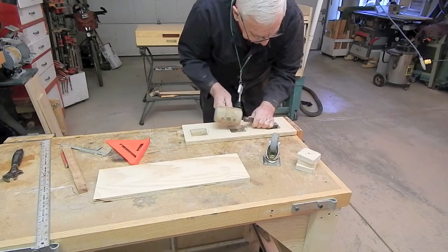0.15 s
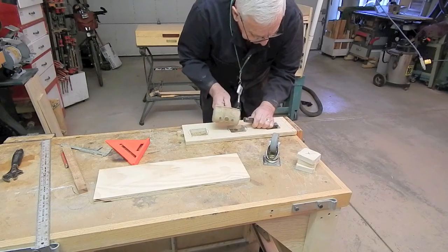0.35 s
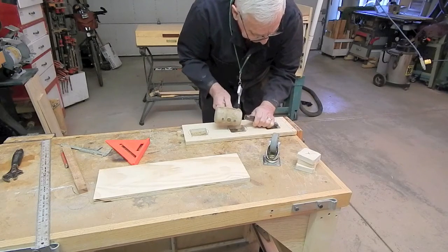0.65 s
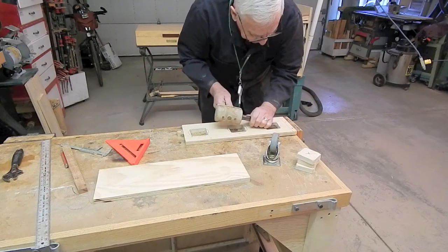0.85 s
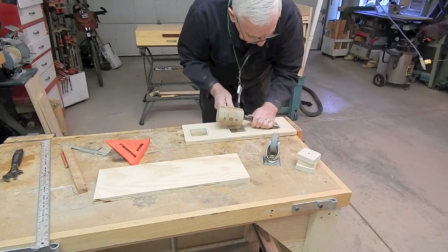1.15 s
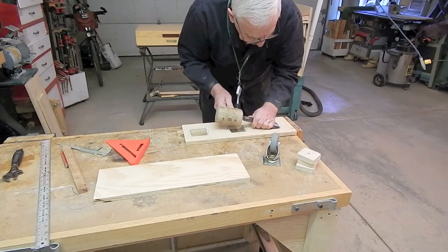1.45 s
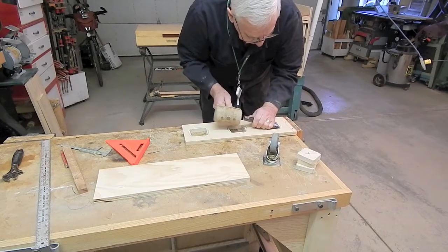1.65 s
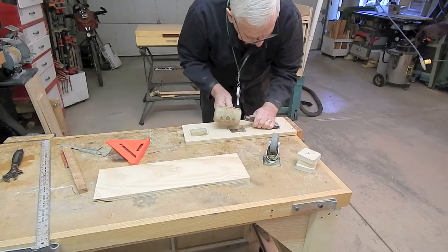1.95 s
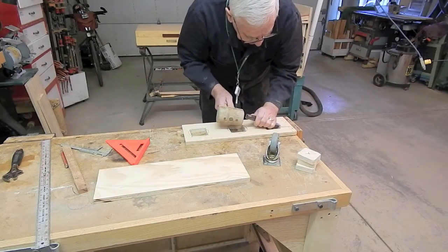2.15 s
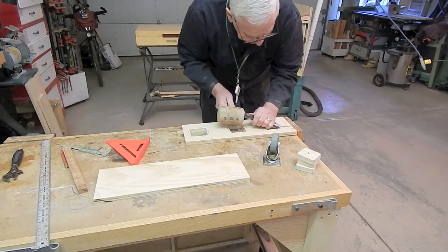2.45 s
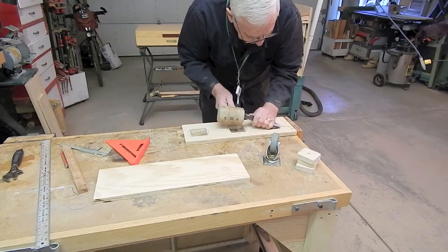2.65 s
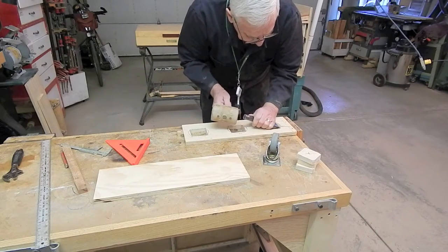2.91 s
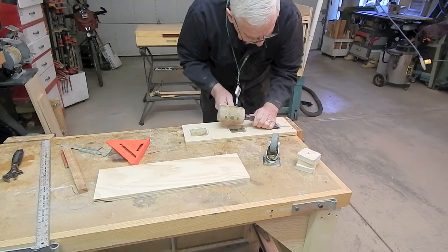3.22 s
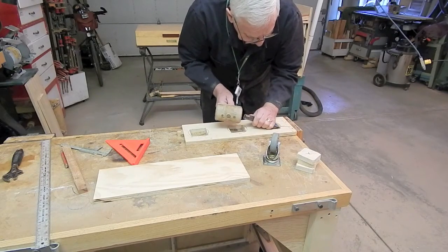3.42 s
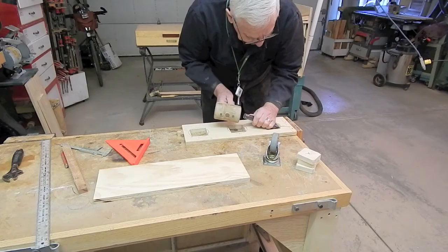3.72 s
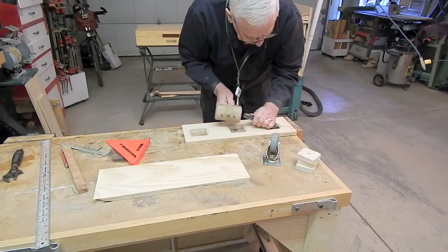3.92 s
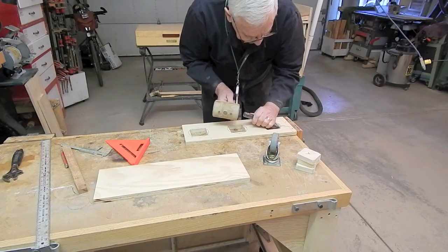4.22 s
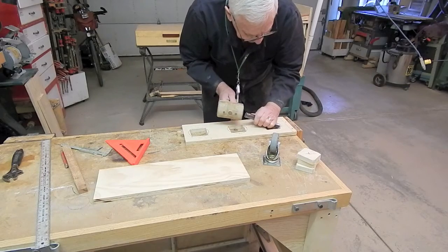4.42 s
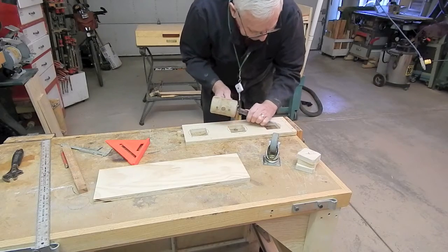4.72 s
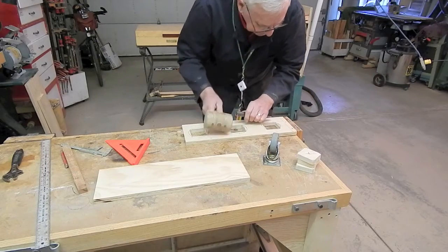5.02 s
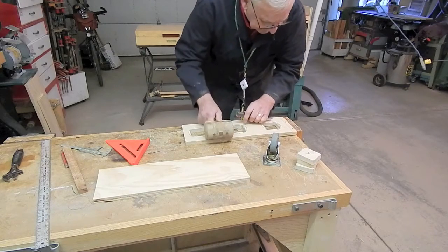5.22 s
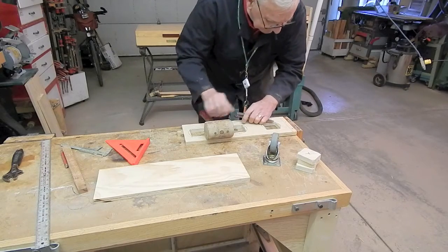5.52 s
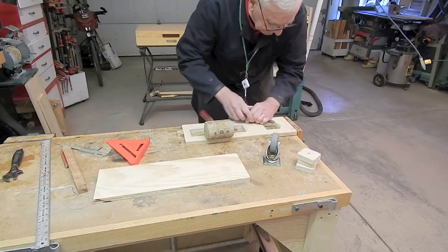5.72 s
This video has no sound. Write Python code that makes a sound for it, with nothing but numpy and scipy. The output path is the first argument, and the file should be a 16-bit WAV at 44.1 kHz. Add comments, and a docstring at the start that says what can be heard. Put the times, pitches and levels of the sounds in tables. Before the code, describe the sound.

In a garage workshop, a wooden mallet strikes a chisel into a board on a heavy bench. Sharp clacks with a slight steel ting and low bench boom come in groups of three or so, about four a second, separated by short pauses with faint chisel repositioning. Wood chips snap. The mallet is put down with a double clunk and a hand brushes the board. The stereo microphone hears clear room reflections over a quiet hum.

```python
"""Garage workshop: a wooden mallet drives a chisel into a board on a workbench, mostly in groups of three.
Each blow sums decaying sines for mallet and handle, blade, board note and bench, plus noise for
contact, fibres and dense bench modes; bench boom weakens through most groups as the chisel bites deeper.
Chips snap as click, crackle and ting; the mallet is put down and rocks to rest. Noise tails form the room.
A hand brushes the board (shaped noise); faint air noise and a hum of steady sines run throughout."""
import sys
import numpy as np
from scipy import signal
from scipy.io import wavfile

SR = 44100
rng = np.random.default_rng(int(sys.argv[2]) if len(sys.argv) > 2 else 0)


def waveform_to_disk(signal):
    """Save audio, clipped to [-1, 1], as 16-bit WAV at the path in sys.argv[1]."""
    frames = np.transpose(np.atleast_2d(signal))
    scaled = np.clip(frames, -1, 1) * 32767
    samples = np.round(scaled).astype(np.int16)
    wavfile.write(sys.argv[1], SR, samples)


N = 258426
AGE_S = np.arange(SR) / SR   # time since an event
EDGES_HZ = 25 * 2 ** np.arange(0, 9.6, .5)
CENTRES_HZ = np.sqrt(EDGES_HZ[1:] * EDGES_HZ[:-1])
BANK = [signal.butter(2, pair, "band", fs=SR, output="sos") for pair in zip(EDGES_HZ, EDGES_HZ[1:])]


def from_db(db):
    """Decibels to gain."""
    return 10 ** (np.asarray(db) / 20)


def at_hz(rows, hz):
    """Columns of a table, interpolated on a log-frequency axis."""
    freqs_hz, *columns = np.transpose(rows)
    return [np.interp(np.log(hz), np.log(freqs_hz), column) for column in columns]


def fade(t60_s):
    """Free exponential decay, 60 dB in t60_s."""
    return np.exp(-np.log(1000) * AGE_S / max(t60_s, 1e-4))


def ring(hz, t60_s):
    """A struck mode: a decaying sine."""
    return np.sin(2 * np.pi * hz * AGE_S) * fade(t60_s)


def unit_energy(x):
    """Scale to a sum of squares of one."""
    return x / np.sqrt(np.sum(x ** 2) + 1e-20)


def later(x, delay_s):
    """The same sound, delayed."""
    return np.interp(AGE_S - delay_s, AGE_S, x, left=0)


def add(out, start_s, sound):
    """Mix a sound in from start_s; it may have begun before time zero."""
    start = round(start_s * SR)
    part = sound[:, max(-start, 0):N - start]
    begin = max(start, 0)
    out[:, begin:begin + part.shape[-1]] += part


def coloured(bands, spectrum):
    """Noise bands weighted by a spectrum; rms 1."""
    noise = np.tensordot(from_db(at_hz(spectrum, CENTRES_HZ)[0]), bands, 1)
    return noise / noise.std()


def burst(noise, t60_s):
    """A decaying crackle cut at random from a noise, starting near rms 1."""
    start = rng.integers(N - SR)
    envelope = fade(t60_s)
    return unit_energy(noise[:, start:start + SR] * envelope) * np.sqrt(2 * np.sum(envelope ** 2))


# Room air spectrum. Each row: frequency in Hz, relative level in dB.
AIR = [(15, -31), (25, 5.5), (114, 6.5), (373, -2), (476, -2), (516, -19), (641, -59), (840, -20),
       (936, -4), (1020, -14), (1400, -9), (2050, -15.5), (3620, -18), (16000, -28)]
AIR_RMS_DB = -52.5
# Machine hum partials. Each row: frequency in Hz, level in dB rms.
HUM = [(107.7, -61.5), (479.1, -63.5), (958.2, -65), (1200, -72), (1437, -70.5)]
# Hand on the board. Each row: time in s, level in dB before the brush gain.
BRUSH = [(5.63, -91), (5.696, -64), (5.785, -64), (5.834, -55), (5.86, -69)]
# Spectrum of the brushing. Each row: frequency in Hz, relative level in dB per Hz.
BRUSH_COLOUR = [(1500, 9), (4000, 9), (7000, -0.5), (12000, 21), (16000, 4)]


def background(bands, brush_gain_db=1):
    """Air as coloured noise, machine hum as steady sines, the sliding hand as noise swelling and fading."""
    t_s = np.arange(N) / SR
    hum = sum(np.sqrt(2) * from_db(db) * np.sin(2 * np.pi * (hz * t_s + rng.random())) for hz, db in HUM)
    times_s, brush_db = np.transpose(BRUSH)
    brush_gain = np.interp(t_s, times_s, from_db(brush_db + brush_gain_db), left=0)
    brush = brush_gain * coloured(bands, BRUSH_COLOUR)
    return from_db(AIR_RMS_DB) * coloured(bands, AIR) + hum + brush


# Workshop acoustics. Each row: frequency in Hz, early reflections in dB, reverberation in dB,
# reverberation t60 in s, left-right likeness (1 = identical sides).
ROOM = [(67, -32, 4, 1.35, 1), (129, -21, -12.5, 0.6, 0.67), (227, -2, -4, 0.64, 0.95),
        (505, -13, -7, 0.75, 0.83), (788, 6, 3.5, 0.63, 0.97), (1404, 0, -14, 0.96, 0.73),
        (2484, 7, 8.5, 0.65, 0), (3516, 33, -2.5, 0.73, 0.74), (4170, -42, -7.5, 0.85, 0),
        (6500, 2.5, -2, 0.53, 0), (14000, 5, -2, 0.7, 0.29)]


def diffuse_bands():
    """Half-octave bands of stereo noise; left-right likeness varies with frequency."""
    white, bands = rng.standard_normal((2, 2, N)), []
    for k, hz in enumerate(CENTRES_HZ):
        mid, side = signal.sosfilt(BANK[k], white[k % 2])
        alike = np.clip(at_hz(ROOM, hz)[-1], -1, 1)
        bands.append(np.sqrt((1 + alike) / 2) * mid + np.sqrt((1 - alike) / 2) * side * [[1], [-1]])
    return np.array(bands)


def echo_envelopes(early_t60_s, early_rise_s, late_rise_s):
    """Per band: quick reflections off bench and floor, then the slow tail of the room."""
    early_shape = unit_energy(fade(early_t60_s) * (1 - np.exp(-(AGE_S / early_rise_s) ** 2)))
    late_rise = 1 - np.exp(-AGE_S / late_rise_s)
    envelopes = []
    for hz in CENTRES_HZ:
        early_db, late_db, t60_s, _ = at_hz(ROOM, hz)
        early = from_db(early_db) * early_shape
        late = from_db(late_db) * unit_energy(fade(t60_s) * late_rise)
        envelopes.append(np.hypot(early, late))
    return np.array(envelopes)


def workshop(parts, bands, envelopes, send_db):
    """Direct sound plus convolution with a noise tail, drawn afresh for each event."""
    start = rng.integers(N - SR)
    echoes = np.einsum("bct,bt->ct", bands[:, :, start:start + SR], envelopes)
    # each part throws its own share into the room
    sent = sum(from_db(db) * part for db, part in zip(send_db, parts))
    return sum(parts) + signal.fftconvolve(sent, echoes, axes=1)[:, :SR]


# Wood fibres giving way at the blade. Each row: start in s, level in dB before part gains, t60 in s.
SNAPS = [(0.906, -46.5, 0.12), (1.2198, -45.5, .04), (2.176, -40.5, 0.0065), (3.934, -19.5, 0.011),
         (4.571, -30.5, 0.052), (4.8214, -28.5, 0.005), (5.089, -42, 0.0042)]
# Spectrum of a snapping fibre. Each row: frequency in Hz, relative level in dB per Hz.
SNAP_COLOUR = [(1500, 4.5), (4000, 5.5), (7000, -3), (10000, 0.5), (13000, -6), (16000, -101)]
SNAP_T60_S, SNAP_RISE_SHARE = 0.012, 0.035   # reference length; rise time constant as a share of t60
CLICK_DB_PER_HALVING = 14   # a shorter snap is more of a click


def chips(bands, envelopes, crackle_db=-6, click_db=0, click_low_hz=6200, click_high_hz=12500,
          blade_hz=4400, blade_db=-9, blade_t60_s=0.0038):
    """Fibres give way with one sharp click and a bright crackle that tings the blade."""
    out, crackle = np.zeros((2, N)), coloured(bands, SNAP_COLOUR)
    click_band_hz = np.clip([click_low_hz, click_high_hz], 10, .45 * SR)
    treble = signal.butter(2, click_band_hz, "band", fs=SR, output="sos")
    pulse = signal.sosfilt(treble, (AGE_S == 0) + 1e-18)
    for start_s, snap_db, t60_s in SNAPS:
        pulse_db = snap_db + CLICK_DB_PER_HALVING * np.log2(SNAP_T60_S / t60_s)
        build_up = 1 - np.exp(-AGE_S / (SNAP_RISE_SHARE * t60_s))
        click = from_db(pulse_db + click_db) * pulse
        snap = click + from_db(snap_db + crackle_db) * burst(crackle, t60_s) * build_up
        ting = from_db(snap_db + blade_db) * ring(blade_hz, blade_t60_s + t60_s) * build_up
        add(out, start_s, workshop([snap, ting], bands, envelopes, send_db=[-1.5, -5]))
    return out


# Places worked on the board. Each row: from time in s, board note in Hz, bench thud in dB, fibre crack in dB.
PLACES = [(-1, 760, 0, 3), (0.5, 743, -0.5, 1.5), (2.5, 743, 2, -3.5), (4, 930, 1.5, -0.5),
          (5, 925, -3.5, -12)]


def place_at(time_s):
    """Note, thud and crack of the place being worked."""
    return [row[1:] for row in PLACES if row[0] <= time_s][-1]


# Centres in Hz of the ranges a blow excites, in order: boom, thud, hollow, note, clack, high clack,
# bite, ting, crack.
RANGES_HZ = [115, 220, 450, 780, 1200, 1700, 3100, 4200, 7000]
# Typical blow: drive in dB of each range, same order.
FORCE_DB = [-8, -10, 2.5, -2.5, -0.25, -4, -15.5, -18.5, -19.5]
GIVE_BELOW_HZ, HARD_ABOVE_HZ = 292, 1310   # give feeds the bass, hard contact the treble


def force(strength_db, give_db, hardness_db, thud_db, crack_db):
    """Drive of each range in dB: a typical blow shaped by stroke, board give, contact hardness and place."""
    hz = np.array(RANGES_HZ)
    bass = 1 / (1 + (hz / GIVE_BELOW_HZ) ** 4)
    treble = 1 / (1 + (HARD_ABOVE_HZ / hz) ** 8)
    place_db = np.array([0, thud_db, 0, 0, 0, 0, 0, 0, crack_db])
    return strength_db + np.array(FORCE_DB) + give_db * bass + hardness_db * treble + place_db


def mode_shapes(modes, rise_s):
    """Ringing of each mode, building up over rise_s; neighbours swing in opposite senses."""
    rings = [(-1) ** k * ring(hz, t60_s) for k, (hz, _, t60_s) in enumerate(modes)]
    return np.array(rings) * (1 - np.exp(-AGE_S / rise_s))


def struck(modes, shapes, drive_db, scatter_db):
    """Sum of modes, each driven by its range with random scatter per blow."""
    hz, level_db, _ = np.transpose(modes)
    mode_drive_db = np.interp(np.log(hz), np.log(RANGES_HZ), drive_db)
    return from_db(level_db + mode_drive_db + scatter_db * rng.standard_normal(len(hz))) @ shapes


# Dense modes of the bench and what lies on it. Each row: frequency in Hz, relative level in dB per Hz.
SHUDDER = [(35, 1), (70, -26), (150, 14.5), (300, 11.5), (500, -11), (900, 4), (1300, 4), (1800, -1),
           (2500, -12), (4000, -4.5), (8000, -37)]


def shudder(bands, drive_db):
    """Modes too close to tell apart sound as a noise, coloured by the blow."""
    band_drive_db = np.interp(np.log(CENTRES_HZ), np.log(RANGES_HZ), drive_db)
    start = rng.integers(N - SR)
    gains = from_db(at_hz(SHUDDER, CENTRES_HZ)[0] + band_drive_db)
    return np.tensordot(gains, bands[:, :, start:start + SR], 1)


NOTE_T60_S, NOTE_T60_S_PER_DB = 0.16, -0.0138   # a louder note dies sooner
TWIN_RATIO, TWIN_DB = .922, -3   # second mode just below, beating with the first


def board_note(hz, sing_db):
    """Two close modes of the board beat; the louder they ring, the sooner they fade."""
    t60_s = NOTE_T60_S + NOTE_T60_S_PER_DB * sing_db
    return from_db(sing_db) * (ring(hz, t60_s) - from_db(TWIN_DB) * ring(TWIN_RATIO * hz, t60_s))


CLICK_T60_S = .005
SLIP_DB, SLIP_WITHIN_S = 2, .03


def slips(crackle, count=3):
    """The blade slips on through the fibres: a few tiny cracks at random moments just after a blow."""
    out = np.zeros((2, N))
    for start_s in SLIP_WITHIN_S * rng.random(count):
        add(out, start_s, burst(crackle, CLICK_T60_S))
    return out[:, :SR]


# Knocks; the chisel is moved and set near 0.9-1.3 and 2.5-2.6 s, the mallet put down from 5.1 s, then rocks
# to rest. Each row: start in s, strength in dB, board give in dB, contact hardness in dB, board note in dB.
BLOWS = [(-0.01, -10, 5, -5, -0.5), (0.1947, -11, 1.5, -0.5, 5.5), (0.4212, -10, -8, 0, -1),
         (0.906, -62.5, 22.5, 6, -4), (1.3011, -39, 16.5, -6.5, 9.5), (1.5674, -18, 5, -2, 12.5),
         (1.7933, -13.5, -2.5, 1, 7.5), (2.0166, -12, -12, 0, -8), (2.472, -60.5, 26, 4, -1),
         (2.647, -40.5, 8, -8, -1), (3.0032, -13.5, 5.5, 3.5, 4), (3.238, -10.5, 4, 0.5, -8),
         (3.4707, -11.5, 3, 0, -13), (3.8251, -11, 3.5, 0.5, -7), (4.07, -11, 0.5, -1.5, -2.5),
         (4.324, -12.5, -5, 0, -7), (5.118, -12, -1.5, -5, 3.5), (5.1702, -10.5, -8.5, 0.5, -13),
         (5.383, -22, 10, -6, -1), (5.403, -17.5, 1.5, -14, -3), (5.688, -49, 12, -16, 9)]
# Bench frame and top. Each row: frequency in Hz, relative level in dB, t60 in s.
BENCH = [(45, -47, 0.15), (68, -7.5, 0.27), (86.14, -4.5, 0.58), (104.7, 9, 0.26), (113.3, 2, 0.2),
         (128.3, 5.5, 0.2), (153.9, -1.5, 0.21), (190.5, -5.5, 0.35), (220.4, 4, 0.28), (238.7, 2, 0.39),
         (258, -7.5, 0.28), (351.5, -7.5, 0.45), (369.6, -12, 0.31), (404.3, -16, 0.5), (490.6, -19, 0.23),
         (591, -16, 0.33), (678, -14, 0.31), (730, -16.5, 0.23), (912, -13.5, 0.21), (1097, -20, 0.29),
         (1160, -22, 0.2), (1240, -8.5, 0.23), (1303, -10.5, 0.29), (1460, -28.5, 0.2), (1670, -13, 0.07),
         (1675, -23, 0.17), (1714, -13, 0.087), (2026, -2.5, 0.086), (2174, -18, 0.34)]
# Mallet, chisel handle and board. Each row: frequency in Hz, relative level in dB, t60 in s.
WOOD = [(423, 3.5, 0.017), (465.2, 1, 0.06), (509.5, -0.5, 0.048), (737, 8, 0.012), (786, 6.5, 0.032),
        (1058, -9.5, 0.052), (1151.6, -5, 0.058), (1221, -6, 0.052), (1323, -8, 0.086), (1587, 4.5, 0.016),
        (1705, -2, 0.044), (1782, -6.5, 0.049), (1875, -4.5, 0.024), (2250, 0, 0.0098), (2860, 0, 0.0068),
        (3410, 5.5, 0.0087), (3753, -1.5, 0.026)]
# Steel blade, damped by the hand. Each row: frequency in Hz, relative level in dB, t60 in s.
BLADE = [(4026, 6.5, 0.018), (4420, 13, 0.013)]
# Spectrum of the crack of contact. Each row: frequency in Hz, relative level in dB per Hz.
CRACK = [(300, -73), (1200, -59), (2500, 7.5), (4300, 19), (5300, 11.5), (7000, 15), (8000, 3), (11500, 4),
         (13500, -14), (16000, -19)]
BALANCE_DB = -2.5   # left over right


def knocks(bands, envelopes, shudder_envelope, note_db=-5, crackle_db=-7, crackle_t60_s=0.051, click_db=11,
           radiate_hz=260, smack_db=6, smack_hz=1300, smack_t60_s=0.0055,
           rebound_db=-7, rebound_s=.037, rebound_spread_s=0.004087):
    """Mallet on chisel: click and ting, clack of the wood, board note, then the slower boom of the bench."""
    out, crackle = np.zeros((2, N)), coloured(bands, CRACK)
    pan = from_db([[BALANCE_DB / 2], [-BALANCE_DB / 2]])
    # small pieces of wood radiate little bass; the heavy bench gets moving slowly
    small = signal.butter(2, radiate_hz, "high", fs=SR, output="sos")
    wood_shapes = mode_shapes(WOOD, rise_s=0.00051)
    blade_shapes = mode_shapes(BLADE, rise_s=0.00096)
    bench_shapes = mode_shapes(BENCH, rise_s=0.036)
    for start_s, strength_db, give_db, hardness_db, sing_db in BLOWS:
        note_hz, *place_db = place_at(start_s)
        drive_db = force(strength_db, give_db, hardness_db, *place_db)
        high_clack_db, crack_db = drive_db[5], drive_db[8]
        board = pan * from_db(strength_db + note_db) * board_note(note_hz, sing_db)
        wood = pan * signal.sosfilt(small, struck(WOOD, wood_shapes, drive_db, scatter_db=3.0))
        # the board hops and lands again, shaking the bench a second time
        boom = struck(BENCH, bench_shapes, drive_db, scatter_db=2.0)
        hop_s = rebound_s + rebound_spread_s * rng.standard_normal()
        bench = pan * (boom + from_db(rebound_db) * later(boom, hop_s))
        # the mallet head stops dead: a brief pressure pulse, with click and ting of the chisel
        smack = from_db(high_clack_db + smack_db) * ring(smack_hz, smack_t60_s)
        click = from_db(crack_db + click_db) * burst(crackle, CLICK_T60_S)
        click = click + from_db(crack_db + SLIP_DB) * slips(crackle)
        ting = struck(BLADE, blade_shapes, drive_db, scatter_db=3.0)
        contact = pan * (smack + ting) + click
        fibres = from_db(crack_db + crackle_db) * burst(crackle, crackle_t60_s)
        parts = [wood, board, bench, contact, fibres]
        add(out, start_s, workshop(parts, bands, envelopes, send_db=[-2.0, -5, -6.5, -8.5, 5.0]))
        add(out, start_s, pan * shudder(bands, drive_db) * shudder_envelope)
    return out


def scene(shudder_rise_s=0.0027, shudder_t60_s=0.55):
    """Knocks and chips in the workshop, over its quiet background."""
    bands = diffuse_bands()
    envelopes = echo_envelopes(early_t60_s=0.15, early_rise_s=0.001, late_rise_s=0.03)
    shudder_envelope = fade(shudder_t60_s) * (1 - np.exp(-AGE_S / shudder_rise_s))
    blows = knocks(bands, envelopes, shudder_envelope)
    return blows + chips(bands, envelopes) + background(diffuse_bands())


CUTOFF_HZ = 16200


def record(dry, top=1.24):
    """Round the loudest peaks with tanh, then low-pass the top."""
    low_pass = signal.ellip(10, .1, 80, CUTOFF_HZ, fs=SR, output="sos")
    return signal.sosfilt(low_pass, top * np.tanh(dry / top))


dry = scene()
out = record(dry)
waveform_to_disk(out)
```